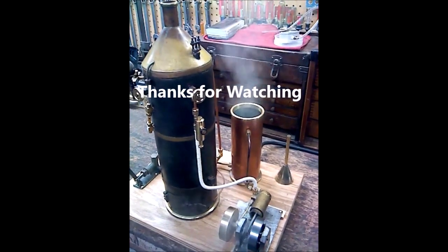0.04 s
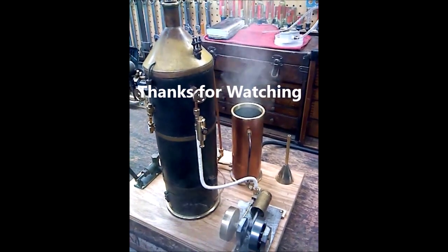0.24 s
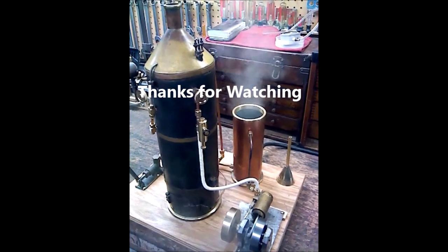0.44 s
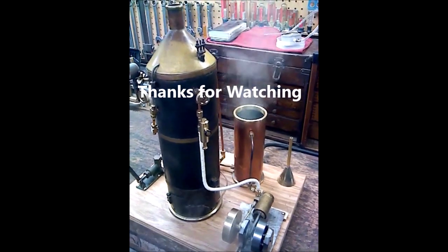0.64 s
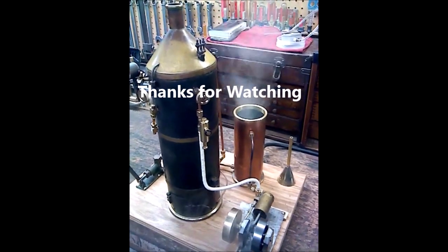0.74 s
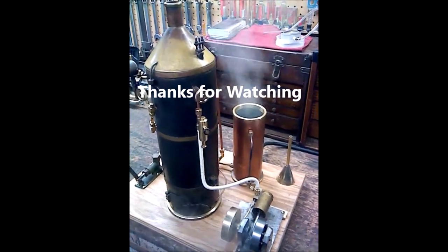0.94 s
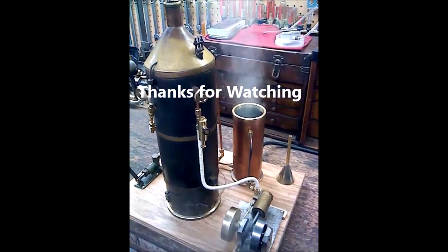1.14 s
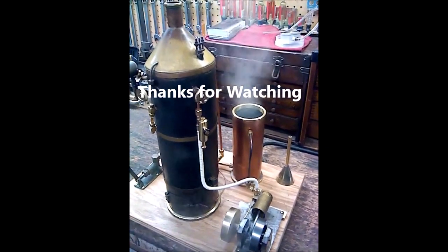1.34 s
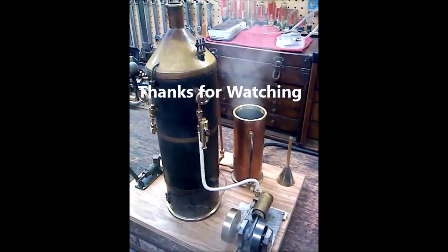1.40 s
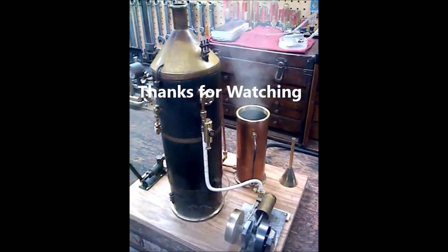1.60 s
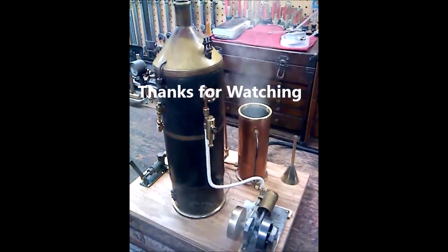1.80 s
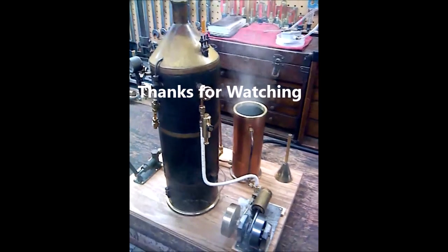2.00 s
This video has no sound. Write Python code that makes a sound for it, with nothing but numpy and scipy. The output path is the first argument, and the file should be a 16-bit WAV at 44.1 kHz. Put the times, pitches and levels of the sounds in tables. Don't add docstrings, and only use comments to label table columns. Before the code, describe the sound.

Quick, even chuffs of hissing steam from a tiny engine, each answered by a small rattling crank knock; a thin whistling steam leak and low flame roar continue underneath, close phone pickup in a small dry room.

```python
import sys
import numpy as np
from scipy import signal
from scipy.fft import rfft, irfft
from scipy.io import wavfile
from scipy.ndimage import uniform_filter1d

SR = 44100
rng = np.random.default_rng(int(sys.argv[2]) if len(sys.argv) > 2 else 0)


def master_out(mix):
    frames = np.transpose(np.atleast_2d(mix))
    ceiling = np.clip(frames, -1, 1)
    pcm = np.round(ceiling * 32767).astype(np.int16)
    wavfile.write(sys.argv[1], SR, pcm)


def makeup_ratio(level_db):
    decades = np.asarray(level_db, float) / 20
    return 10 ** decades


N = 90581
T = np.arange(N) / SR
TURN_S = .12035


def evened(x):
    return x / np.sqrt(np.mean(x ** 2) + 1e-20)


def coloured(x, jet, rings, ring_db, size=4096):
    hz = np.fft.rfftfreq(size, 1 / SR)
    f, db = np.transpose(jet)
    jet_db = np.interp(np.log(hz + 1), np.log(f + 1), db, left=db[0] - 29, right=db[-1])
    power = makeup_ratio(jet_db) ** 2
    for centre, width, top_db in rings:
        peak = 1 + (2 * (hz - centre) / width) ** 2
        power = power + makeup_ratio(top_db + ring_db) ** 2 / peak ** 2
    ceps = irfft(np.log(power) / 2)
    ceps[1:size // 2] *= 2
    ceps[size // 2 + 1:] = 0
    taps = irfft(np.exp(rfft(ceps)))
    return signal.fftconvolve(x, taps / np.linalg.norm(taps))[:N]


def turbulence(flutter_db, span_s):
    span = int(span_s * SR)
    wander = uniform_filter1d(uniform_filter1d(rng.standard_normal(N), span), span)
    return evened(rng.standard_normal(N) * makeup_ratio(flutter_db * evened(wander)))


ROOM_T60_S, NEAR_WET_DB, FAR_WET_DB = .09, -9, -5


def workshop(x, wet_db):
    at = np.arange(40, 8000, 22) + rng.integers(0, 22, 362)
    taps = np.zeros(8100)
    taps[at] = rng.choice([-1., 1.], len(at)) * makeup_ratio(-60 * at / SR / ROOM_T60_S)
    taps *= makeup_ratio(wet_db) / np.linalg.norm(taps)
    taps[0] = 1
    return signal.fftconvolve(x, taps / np.linalg.norm(taps))[:N]


# (f/Hz, level/dB)
HUM_TONES = [(59.2, -87.5), (118.4, -85.5), (247.6, -88)]


def mains_hum():
    hum = np.zeros(N)
    for hz, db in HUM_TONES:
        hum += np.sqrt(2) * makeup_ratio(db) * np.sin(2 * np.pi * (hz * T + rng.random()))
    return hum


# (f/Hz, level/dB)
FLAME_ROAR = [(20, -26), (65, -18), (150, -24), (420, -23), (680, -20), (900, -9), (1400, -14), (2300, -26),
              (5000, -59)]
# (f/Hz, width/Hz, level/dB)
FLUE_RINGS = [(570, 40, -14), (765, 60, -7), (822, 40, -4), (900, 45, -3), (972, 60, 0), (1035, 45, -4),
              (1108, 45, -5), (1220, 50, -11), (1320, 40, -7), (1378, 45, -4), (1440, 50, -8),
              (1535, 50, -10), (1645, 50, -9), (1720, 60, -14)]
FLAME_DB, FLAME_RING_DB, FLAME_FLUTTER_DB = -56.3, .1, 2.2
THROB_DB, THROB_TOP_S = 1.2, .066


def boiler_flame():
    stroke = np.cos(2 * np.pi * (T - THROB_TOP_S) / (TURN_S / 2))
    throb = makeup_ratio(FLAME_DB + THROB_DB * stroke)
    roar = throb * turbulence(FLAME_FLUTTER_DB, .0073)
    return coloured(roar, FLAME_ROAR, FLUE_RINGS, FLAME_RING_DB)


# (f/Hz, level/dB)
LEAK_HISS = [(2000, -30), (3500, -31), (5700, -18), (6800, -5), (7400, -11), (9800, -32), (12500, -36),
             (16000, -31)]
# (f/Hz, width/Hz, level/dB)
SEAM_WHISTLES = [(5440, 60, -22), (6090, 60, -11), (6255, 60, -6), (6420, 110, -7), (6590, 70, -5),
                 (6790, 90, -4), (7060, 80, -1), (7230, 90, -3), (7340, 50, -8), (7870, 90, -11),
                 (8170, 90, -14), (8880, 150, -20), (14500, 110, -24), (15800, 210, -21)]
LEAK_DB, WHISTLE_DB, LEAK_FLUTTER_DB = -47.5, .1, 1.3


def steam_leak():
    rush = turbulence(LEAK_FLUTTER_DB, .004)
    return makeup_ratio(LEAK_DB) * coloured(rush, LEAK_HISS, SEAM_WHISTLES, WHISTLE_DB)


# (t/s, level/dB)
STEADY_FADE = [
    (0, 1.5),
    (1.0, -0.4),
    (2.05, -3),
]


def steady():
    fade = makeup_ratio(np.interp(T, *np.transpose(STEADY_FADE)))
    return fade * (workshop(steam_leak(), FAR_WET_DB) + boiler_flame()) + mains_hum()


# (t/s, length/s, level/dB)
WATER_DROP = (1.7648, .0003, -29)
# (f/Hz, level/dB)
SNAP_COLOUR = [(2500, -30), (4500, -4), (7000, 0), (10000, -8), (16000, -8)]


def droplet():
    s, length, db = WATER_DROP
    burst = np.exp(-((T - s) / length) ** 2)
    snap = makeup_ratio(db) * burst * np.sign(rng.standard_normal(N))
    return coloured(snap, SNAP_COLOUR, [], 0)


# (t/s, peak level/dB)
CRANK_KNOCKS = [(0.1101, -45), (0.2309, -48.5), (0.3511, -45.5), (0.4713, -47.5), (0.5911, -45),
                (0.7118, -47), (0.832, -46), (0.9517, -49.5), (1.0726, -48.5), (1.1927, -48.5),
                (1.3129, -49), (1.4338, -46.5), (1.5537, -47.5), (1.6746, -49.5), (1.7948, -51.5),
                (1.9155, -50), (2.0363, -51)]
# (f/Hz, level/dB, t60/s)
FRAME_MODES = [(570, -9, .03), (750, -2, .035), (980, -4, .03), (1400, -5, .02), (1680, -4, .022),
               (1940, 3, .025), (2180, 2.5, .025), (2420, 1, .025), (2560, -5, .02), (2900, -3, .012),
               (3290, -4, .022)]
# (delay t/s, level/dB)
KNOCK_BOUNCES = [
    (.0042, -2.5),
    (.0088, -13),
    (-.0075, -15),
]
KNOCK_DB, KNOCK_LATE_S, KNOCK_RISE_S = 4.5, .0003, .0003


def crank():
    t = T[:3000]
    out = np.zeros(2 * N)
    rise = 1 - np.exp(-t / KNOCK_RISE_S)
    for s, db in CRANK_KNOCKS:
        ring = np.zeros(len(t))
        for hz, mode_db, t60 in FRAME_MODES:
            vary = rng.standard_normal()
            level = makeup_ratio(mode_db + 2.2 * vary - 60 * t / t60)
            ring += level * np.sin(2 * np.pi * hz * (1 + .004 * vary) * t) * rise
        for delay, bounce_db in [(0, 0)] + list(KNOCK_BOUNCES):
            start = round((s + delay + KNOCK_LATE_S) * SR)
            out[start:start + len(t)] += makeup_ratio(db + bounce_db + KNOCK_DB - 10) * ring
    return out[:N]


# (t/s, level/dB, port open/s)
EXHAUST_PUFFS = [(.054, -37, .02), (.1743, -37, .019), (.2947, -38, .02), (.415, -38, .019),
                 (.5354, -39, .02), (.6557, -39, .019), (.7761, -39, .019), (.8964, -39, .02),
                 (1.0168, -39, .018), (1.1371, -39, .019), (1.2575, -40, .019), (1.3778, -40, .02),
                 (1.4982, -41, .019), (1.6185, -41, .019), (1.7389, -41, .02), (1.8592, -41, .019),
                 (1.9796, -41, .019)]
# (f/Hz, level/dB)
PUFF_RUSH = [(250, -36), (3600, -21), (4100, -15.5), (5700, -12), (6960, -2), (10500, -15), (14200, -11),
             (16000, -16)]
# (f/Hz, width/Hz, level/dB)
TUBE_RINGS = [(3038, 90, -16), (3865, 110, -8), (6500, 400, -4), (6990, 300, -1), (7250, 150, -3),
              (7840, 140, -5), (8190, 110, -7), (9500, 120, -9), (10310, 200, -10), (10900, 90, -12),
              (12300, 330, -16.5), (12800, 140, -15), (14000, 370, -10.5), (15700, 90, -10)]
PUFF_DB, TUBE_RING_DB, SPIT_DB = 5.0, 3.0, 2.0
SEEP_S, SEEP_DB = .026, -24
LEAD_S, OPEN_S = .0095, .013
SAG_DB_PER_S, SHUT_T60_S = -230, .085
LINGER_DB, LINGER_T60_S = -18.5, .27


def exhaust():
    flow = np.zeros(N)
    _, first_db, first_held = EXHAUST_PUFFS[0]
    earlier = (EXHAUST_PUFFS[0][0] - TURN_S, first_db, first_held)
    for s, db, held in [earlier] + list(EXHAUST_PUFFS):
        t = T - s + LEAD_S
        opening = np.clip(t / OPEN_S, 0, 1) ** 2
        seep = makeup_ratio(SEEP_DB) * np.clip(2 * (t + SEEP_S) / SEEP_S, 0, 1)
        shut = np.maximum(t - LEAD_S - held, 0)
        sag_db = SAG_DB_PER_S * np.clip(t - OPEN_S, 0, held)
        jet = makeup_ratio(sag_db - 60 * shut / SHUT_T60_S)
        linger = makeup_ratio(LINGER_DB - 60 * shut / LINGER_T60_S)
        flow += (makeup_ratio(db + PUFF_DB) * (opening + seep)) ** 2 * (jet ** 2 + linger ** 2)
    steam = np.sqrt(flow) * turbulence(SPIT_DB, .001)
    return coloured(steam, PUFF_RUSH, TUBE_RINGS, TUBE_RING_DB)


def scene():
    return (steady() + droplet() + crank() + workshop(exhaust(), NEAR_WET_DB))[None]


def roll_off(x):
    return signal.sosfilt(signal.butter(12, 16530, fs=SR, output="sos"), x)


# (end t/s, length/s, kept range level/dB)
THIN_MOMENTS = [
    (0.224, 0.013, 21),
    (1.7205, 0.022, 22),
]
THIN_DB = -24
OFFSET = -.0008
EDGE_HZ = 15830


def record(dry):
    z = signal.stft(dry[0], nperseg=1024, noverlap=768)[2]
    below_db = 20 * np.log10(abs(z).max(0) / (abs(z) + 1e-12) + 1e-12)
    out = dry[0].copy()
    for end, length, range_db in THIN_MOMENTS:
        kept = makeup_ratio(THIN_DB / np.exp(range_db - below_db))
        thin = signal.istft(z * kept, nperseg=1024, noverlap=768)[1][:N]
        sink = np.clip(1.68 * (T - end + length) / length, 0, 1)
        snap_back = np.clip((end - T) / .0016, 0, 1)
        out += sink * snap_back * (thin - dry[0])
    low_pass = signal.firwin(1023, EDGE_HZ, window=("kaiser", 9), fs=SR)
    out = signal.fftconvolve(out, low_pass, "same")
    return roll_off(out[None] + OFFSET)


dry = scene()
out = record(dry)
master_out(out)
```